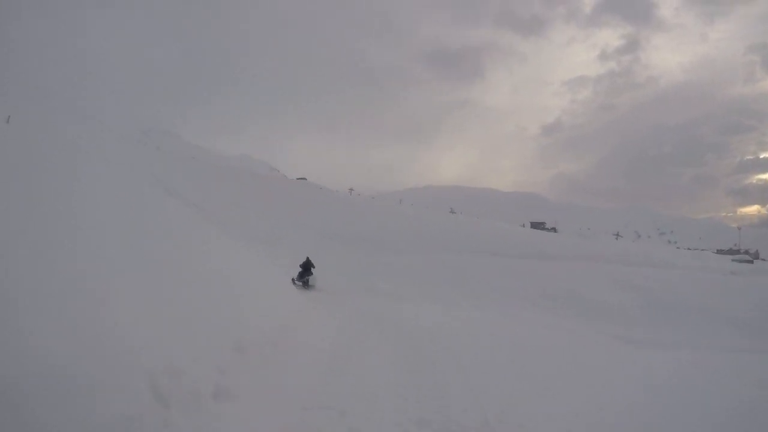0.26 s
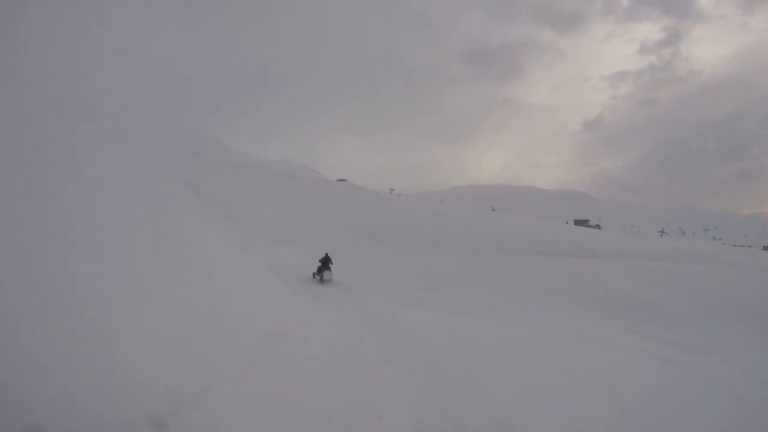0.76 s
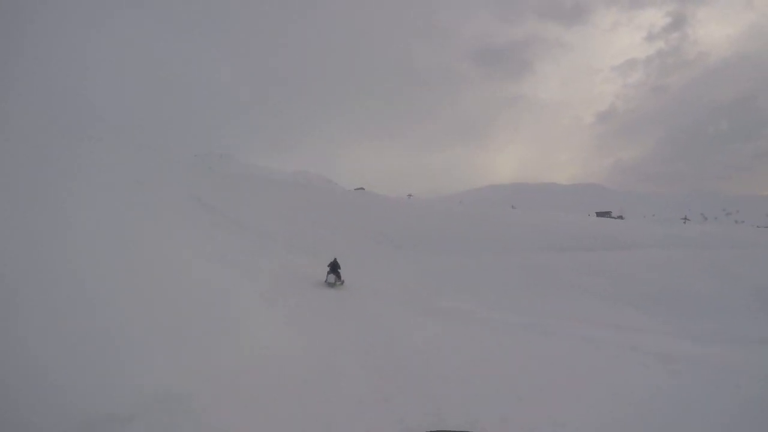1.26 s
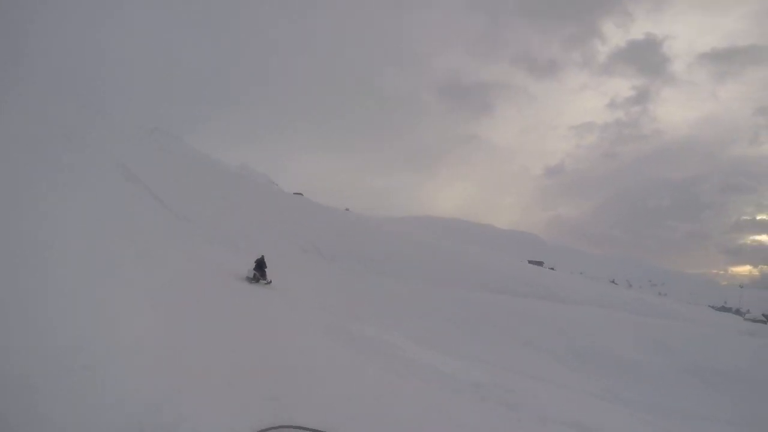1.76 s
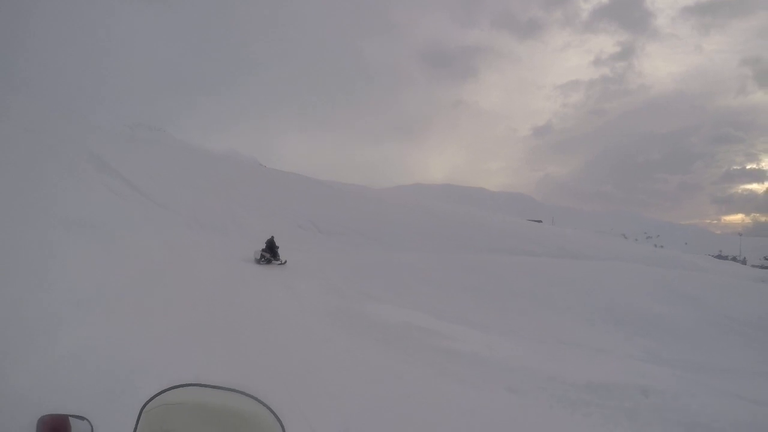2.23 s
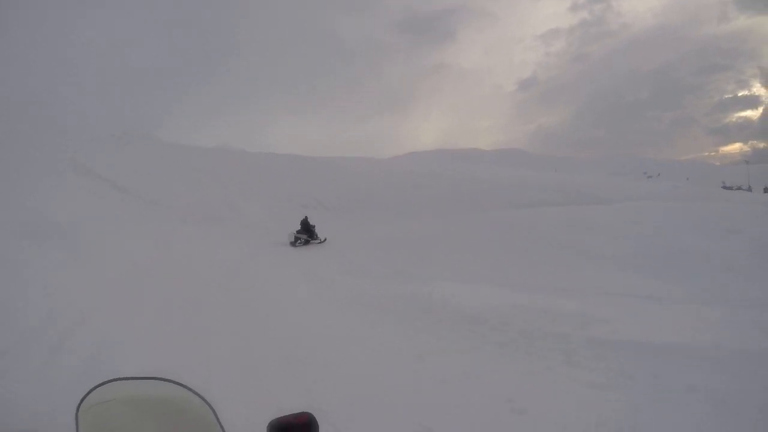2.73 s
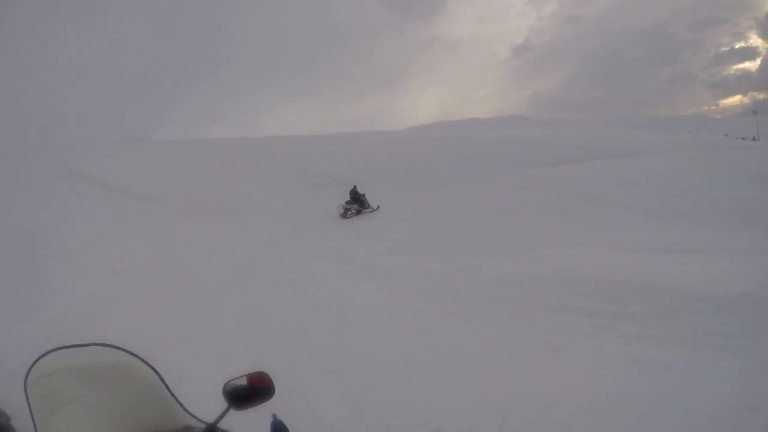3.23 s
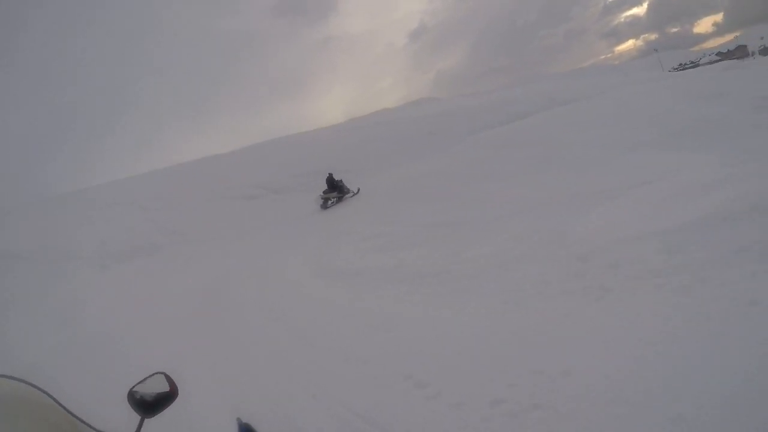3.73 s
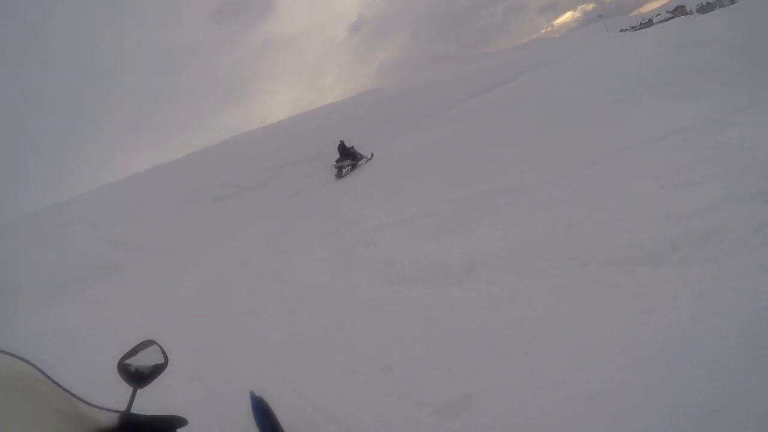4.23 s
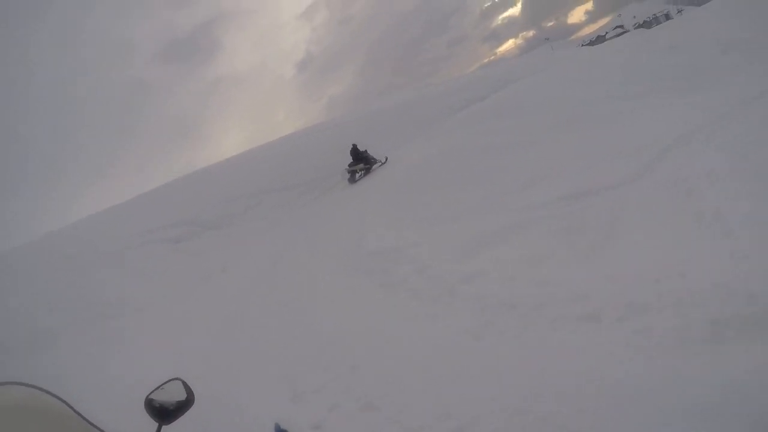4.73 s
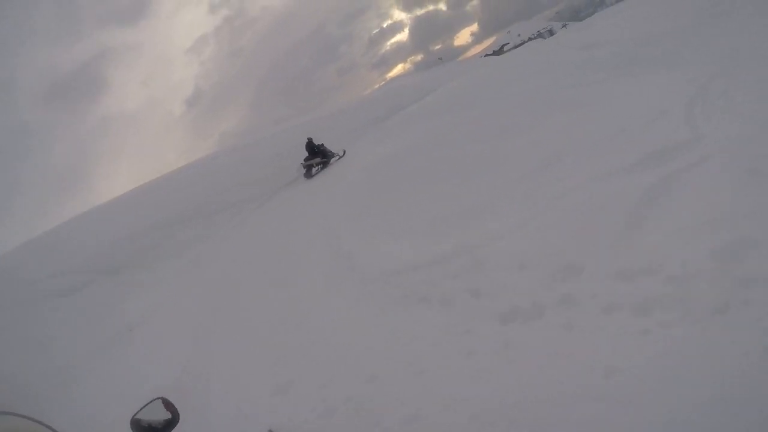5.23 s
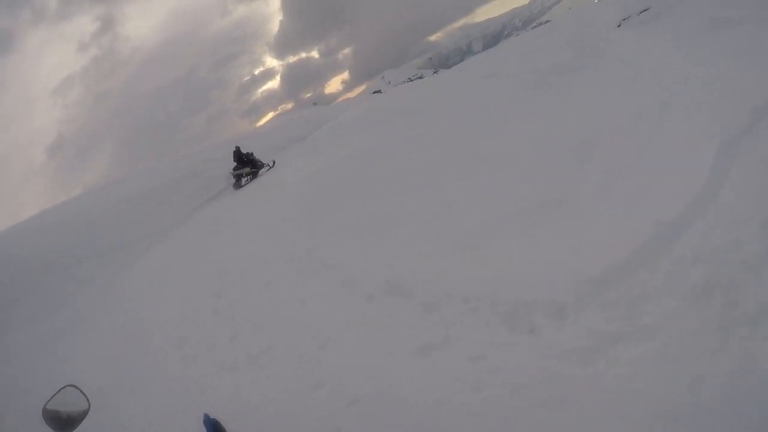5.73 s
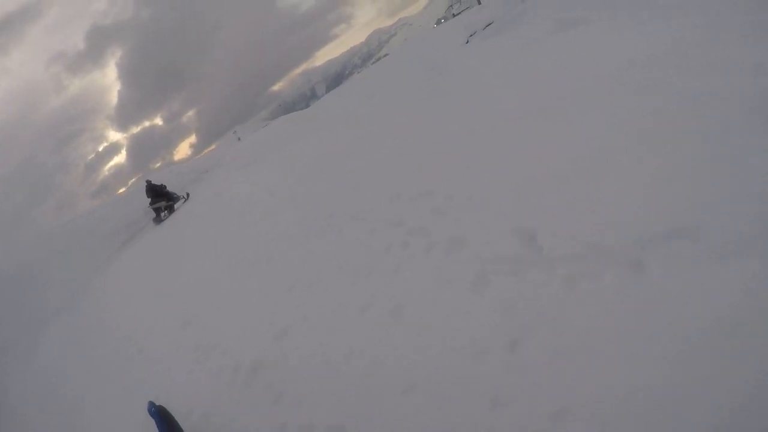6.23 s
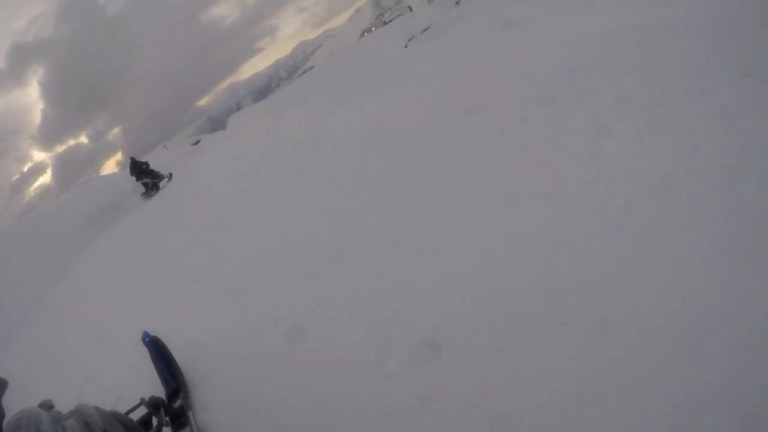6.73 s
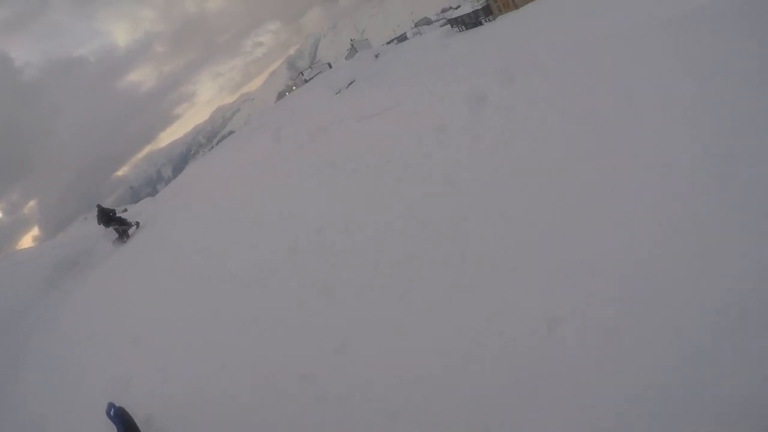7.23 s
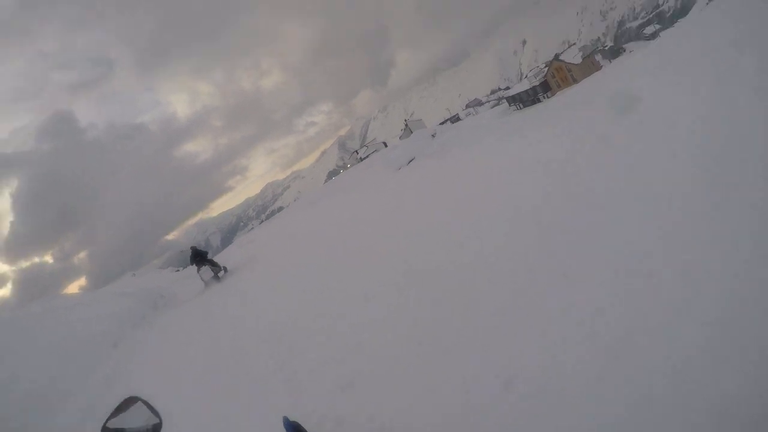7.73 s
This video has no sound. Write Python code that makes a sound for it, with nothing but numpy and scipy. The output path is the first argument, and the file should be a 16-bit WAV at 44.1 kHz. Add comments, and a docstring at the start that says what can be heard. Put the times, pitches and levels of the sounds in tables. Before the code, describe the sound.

Close on a snowmobile in open snow, slightly dull stereo from an onboard microphone. At 0 s a low, buzzing engine drone runs at light throttle with drive clatter, soft track hiss and thin high belt chirps; wind is comparatively light. From about 0.5 s the engine climbs, reaching a higher note near 2 s, with a small thump around 1.7 s as deep buffeting arrives. It sags near 3 s, then holds steady from 3.3 to 5.4 s, a cowl panel buzzing and rattling, hollow wind boom coming and going, with faint ice ticks. At 5.4 s a hard pull sweeps upward to about 6.3 s, intake whining and track hiss swelling under very heavy wind rumble. The revs drop at 6.4-6.6 s, surge again to 7.15 s, then fall away to a low drone. Gusts continue; a dull, heavy jolt knocks at 7.85 s, just before the end at 8 s.

```python
"""A snowmobile heard from the rider's seat on snow, close to every working part.
From the start pipe-coloured orders drone, the cowl hums, drive and track hiss and a faint belt chirps.
It speeds up, then cruises near the cowl's resonance, where the panel rattles once an engine cycle.
Two hard pulls of throttle follow: the intake whines as filtered blows and the track noise swells.
Buffeting, boom and rush of wind come and go at the microphone and gain weight; ice ticks and jolts knock."""
import sys
import numpy as np
from scipy import signal
from scipy.fft import rfft, irfft, next_fast_len
from scipy.io import wavfile
from scipy.ndimage import uniform_filter1d

SR = 44100
rng = np.random.default_rng(int(sys.argv[2]) if len(sys.argv) > 2 else 0)


def log_audio(samples):
    """Write samples as a 16-bit WAV file to the path given in sys.argv[1]."""
    # one column per channel
    frames = np.atleast_2d(samples).T
    # limit to full scale, then quantise
    limited = np.clip(frames, -1, 1)
    pcm = np.round(limited * 32767).astype(np.int16)
    wavfile.write(sys.argv[1], SR, pcm)


N = 351914
T = np.arange(N) / SR
HZ = np.fft.rfftfreq(next_fast_len(N), 1 / SR)

# engine speed: (time [s], rate [engine cycles a second])
SPEED = [(0.0, 32.0), (0.33, 31.78), (0.84, 34.5), (1.13, 35.08), (1.44, 39.16), (1.76, 41.68),
         (2.27, 42.06), (2.38, 41.42), (2.69, 37.86), (3.0, 36.92), (3.3, 38.14), (3.62, 39.32),
         (4.05, 39.62), (4.51, 39.52), (4.73, 38.7), (5.05, 38.82), (5.38, 38.62), (5.6, 42.46),
         (5.82, 46.66), (6.11, 50.86), (6.29, 52.84), (6.6, 42.2), (6.8, 41.68), (7.07, 45.3),
         (7.16, 46.26), (7.27, 43.76), (7.58, 35.4), (7.71, 34.6), (7.98, 30.6)]
# throttle opening: (time [s], opening [0-1])
THROTTLE = [(0.3, 0), (0.8, 0.39), (1.15, 0.52), (1.5, 0.73), (2.05, 0.57), (2.6, 0.44), (2.95, 0.47),
            (3.3, 0.48), (4.5, 0.65), (4.75, 0.38), (5.38, 0.58), (5.48, 0.84), (5.7, 0.85), (6.05, 0.94),
            (6.28, 0.92), (6.33, 0.6), (6.4, 0), (6.52, 0.37), (6.62, 0.55), (6.7, 0.74), (6.85, 0.87),
            (7, 0.88), (7.15, 0.91), (7.21, 0.18), (7.8, 0)]


def gain_of(db):
    """Decibels to an amplitude factor."""
    return np.exp(np.asarray(db) * (np.log(10) / 20))


def evened(x):
    """Scales to rms 1."""
    return x / np.sqrt(np.mean(abs(x) ** 2) + 1e-20)


def read(points, hz):
    """Reads a spectrum table on a log-frequency axis."""
    f, value = np.transpose(points)
    return np.interp(np.log(hz + 1), np.log(f + 1), value)


def curve(rows, axis=1):
    """One column of a time table at every sample."""
    rows = np.asarray(rows)
    return np.interp(T, rows[:, 0], rows[:, axis])


def wander(rate_hz):
    """Random drift of rms 1, with rate_hz new values a second."""
    return evened(np.interp(T * rate_hz, np.arange(4000), rng.standard_normal(4000)))


def wide_open(threshold=.7):
    """How far the throttle is into its top range, 0-1."""
    return np.clip((curve(THROTTLE) - threshold) / (1 - threshold), 0, 1)


def effort(base_db, throttle_db, pace_db, octave_db, cruise_hz=40):
    """Gain of a part: base level, plus so much at full throttle, at full pace and per octave of engine speed."""
    # speed over the snow: (time [s], pace [0-1])
    pace = [(0, 0.18), (1.0, 0.13), (2.0, 0.32), (3.1, 0.22), (3.9, 0.66), (5.3, 0.53), (6.2, 1),
            (6.6, 0.82), (7.8, 0.93), (7.98, 0.44)]
    octaves = np.log2(curve(SPEED) / cruise_hz)
    return gain_of(base_db + throttle_db * curve(THROTTLE) + pace_db * curve(pace) + octave_db * octaves)


def tinted(x, colour):
    """Both channels of x with the given gain at every frequency."""
    size = next_fast_len(N)
    return irfft(rfft(x, size) * colour, size)[:, :N]


def ports(x, other=None, balance=None, phase=None):
    """Sound reaches two microphone ports with a lag and a level difference; diffuse sound is only partly alike."""
    # usual difference between the ports: (frequency [Hz], left minus right [dB])
    port_balance = [(40, 1.3), (110, 1.3), (370, 3.5), (500, 5), (600, 7), (720, 13.5), (820, -1.5),
                    (1080, -4.5), (1300, -1), (2320, -2), (4270, 0.5), (6000, -15.5), (7850, -10),
                    (10000, -6.5), (14000, -10)]
    # usual lag between the ports: (frequency [Hz], left leads [rad])
    port_phase = [(200, -0.44), (560, 0.06), (620, -0.3), (720, -3), (800, -3), (880, -2.5), (1000, -3),
                  (1200, -3), (1400, -4), (1720, -4.5), (2300, -5), (9300, -5)]
    # how alike diffuse sound is at the ports: (frequency [Hz], likeness [0-1])
    port_likeness = [(60, 1), (130, 1), (300, 0.68), (700, 0.78), (1700, 0.74), (3000, 1), (6000, 0.33),
                     (14000, 0.58)]
    balance = port_balance if balance is None else balance
    phase = port_phase if phase is None else phase
    size = next_fast_len(N)
    left = right = rfft(x, size)
    if other is not None:
        same = np.clip(read(port_likeness, HZ), 0, 1)
        right = same * left + np.sqrt(1 - same ** 2) * rfft(other, size)
    ratio = gain_of(read(balance, HZ))
    lagged = right * np.exp(-1j * read(phase, HZ))
    pair = np.array([left * ratio, lagged]) / np.hypot(1, ratio)
    return evened(irfft(pair, size)[:, :N])


def noise(colour):
    """Diffuse noise at the two ports, coloured by a gain at every frequency and scaled to rms 1."""
    return ports(*tinted(rng.standard_normal((2, N)), colour))


def ring(x, spectrum, size=4096):
    """Passes x through a body that rings after each blow, as a minimum-phase filter."""
    log_gain = np.log(gain_of(read(spectrum, abs(np.fft.fftfreq(size, 1 / SR)))))
    response = np.fft.ifft(np.exp(np.conj(signal.hilbert(log_gain)))).real
    return signal.oaconvolve(x, response[:size // 2])[:N]


def blows(turns, rough, puff_turns, uneven_db):
    """Once a cycle a sharp blow of uneven strength and a dying puff of noise."""
    kicks = np.diff(np.floor(turns), prepend=np.floor(turns[0]))
    puffs = np.exp(-(turns % 1) / puff_turns) * rng.standard_normal(N)
    strength = gain_of(uneven_db * rng.standard_normal(1000))[turns.astype(int)]
    return strength * (evened(kicks) + rough * evened(puffs))


def engine_note(turns, speed, waver=0.11):
    """Clean engine orders sweep through the pipe's resonances; their balance shifts with load and throttle."""
    # strength of each order: (multiple of the cycle rate, light load [dB], medium load [dB],
    # heavy load [dB], throttle wide open [dB])
    orders = [(5, -6.5, -14.0, -20.0, -5.5), (6, -1.0, -8.0, -8.5, -3.5), (7, -11.0, -6.5, -9.0, -8.5),
              (8, -2.0, -13.5, -14.0, -11.5), (9, 4.5, 5.0, 1.0, -5.5), (10, -1.0, -2.0, -13.5, -9.0),
              (11, 6.0, -8.5, -5.5, -7.0), (12, -1.5, 5.0, -1.0, -7.5), (13, -7.5, -5.0, -11.5, -8.5),
              (14, 0.5, -9.0, -9.5, -7.0), (15, 0.0, -7.5, -5.0, -14.0), (16, -6.5, -2.0, -2.5, -11.5),
              (17, -12.5, -8.5, -8.0, -12.0), (18, -9.5, 3.0, -3.0, -6.0), (19, -11.5, -5.0, -11.5, -14.5),
              (20, -11.5, -12.5, -6.5, -9.5), (21, -6.0, -6.5, -1.5, -4.5), (22, -8.5, -7.5, -7.5, -10.5),
              (23, -10.5, -1.5, 0.5, -2.5), (24, -4.5, 0.5, -9.0, -12.0), (25, -5.0, -5.0, -4.5, -7.5),
              (26, -7.5, -5.0, -8.0, -11.0), (27, -12.5, 2.5, -3.0, -6.0), (28, -3.0, -1.0, -1.5, -4.5),
              (29, -2.0, -0.0, 1.5, -1.5), (30, -2.5, -6.0, -0.0, -3.0), (31, -4.0, -6.5, -3.5, -6.5),
              (32, -4.5, -6.0, -6.5, -9.5), (33, -5.0, -6.5, -11.5, -14.5)]
    # resonances of the exhaust pipe: (frequency [Hz], gain [dB])
    pipe = [(160, 5), (205, 6), (260, -4), (315, 2), (350, -1.5), (380, 0), (430, -1), (490, -0.5),
            (540, -6), (590, 2), (680, -6.5), (770, -7.5), (840, -2.5), (900, -1.5), (990, 0.5),
            (1120, 0.5), (1250, -8.5), (1450, -16)]
    # load on the engine: (time [s], load [0-1])
    load_rows = [(1.1, 0), (1.35, 0.56), (2.4, 0.61), (2.7, 0.17), (2.95, 0.19), (3.25, 0.44)]
    load = np.clip(curve(load_rows), 0, 1)
    blend = np.sqrt(wide_open())
    tone = np.zeros(N)
    for order, light_db, medium_db, heavy_db, open_db in orders:
        loaded_db = np.interp(load, [0, .5, 1], [light_db, medium_db, heavy_db])
        db = (1 - blend) * loaded_db + blend * open_db
        phase = 2 * np.pi * (round(order) * turns + rng.random()) + waver * wander(14)
        tone += gain_of(db + read(pipe, round(order) * speed)) * np.cos(phase)
    gain = effort(base_db=-46.8, throttle_db=13.5, pace_db=-2.0, octave_db=0.0)
    return ports(tone) * np.std(tone) * gain


def cowl(turns, hum_db=5, shake_hz=39.5, shake_width_hz=0.6, shake_db=8.5):
    """A panel hums with the engine orders; near shake_hz it rattles instead, with one sharp blow a cycle."""
    # resonance of the panel: (frequency [Hz], gain [dB])
    panel = [(1200, -42), (1560, -20), (1620, -6), (1670, 5), (1735, 8.5), (1810, 5.5), (1900, -2.5),
             (2000, -19), (2500, -23.5), (3500, -39)]
    kicks = blows(turns + .93, rough=.05, puff_turns=.2, uneven_db=.3)
    sympathy = 1 / np.sqrt(1 + ((curve(SPEED) - shake_hz) / shake_width_hz) ** 2)
    one_cycle = irfft(np.exp(2j * np.pi * rng.random(80)), 2048)  # orders of random phase
    hum = one_cycle[(turns % 1 * len(one_cycle)).astype(int)]
    rattle = sympathy * gain_of(shake_db) * evened(ring(kicks, panel))
    steady_hum = (1 - sympathy) ** 2 * gain_of(hum_db) * evened(ring(ring(hum, panel), panel))
    buzz = rattle + steady_hum
    gain = effort(base_db=-51.5, throttle_db=12.5, pace_db=7.5, octave_db=9.5)
    return ports(buzz) * np.std(buzz) * gain


def drive(turns, throb_db=0.0, flutter_db=0.89):
    """Clutch, chain and track clatter as noise of fluttering level; a few parts ring in narrow bands."""
    # colour of the clatter: (frequency [Hz], gain [dB])
    clatter_colour = [(150, -11), (300, -10.5), (420, -8), (500, -13.5), (580, -12), (670, -11), (760, -8),
                      (1000, -3.5), (1150, -2), (1300, -5), (1490, -8.5), (1620, 0), (1850, 0),
                      (2050, -8.5), (2300, -13), (2700, -17), (3600, -33.5)]
    # ringing parts: (frequency [Hz], width [Hz], relative level [dB])
    ring_modes = [(830, 17, -7.5), (2115, 47, -12), (2990, 70, -18.5), (3670, 42, -28), (4464, 60, -20),
                  (7000, 73, -40), (7760, 73, -40)]
    clatter = noise(gain_of(read(clatter_colour, HZ)))
    rings = sum(gain_of(db) * evened(1 / (1 + (2 * (HZ - hz) / width) ** 2)) for hz, width, db in ring_modes)
    ringing = noise(rings) * np.sqrt(np.mean(rings ** 2))
    # throb_db would pulse the clatter with the engine; at 0 it is still
    shake = throb_db * np.cos(2 * np.pi * (turns - .85)) + flutter_db * wander(90)
    gain = effort(base_db=-38.5, throttle_db=2.5, pace_db=7.5, octave_db=2.5)
    return (clatter + gain_of(-4.5) * ringing) * gain_of(shake) * gain


def track(turns, throb_db=1.0, suck_db=2.0, grain_db=0.97, roar_db=5.0, steepness=4):
    """Grainy hiss of the track churning snow; it swells and pulses as the open throttle sucks air."""
    # colour of the hiss: (frequency [Hz], gain [dB])
    snow_colour = [(1500, 2.5), (2600, 1.5), (3000, 9.5), (3450, 2.5), (4450, 4.5), (5300, -.5),
                   (6900, 3.5), (7300, 0), (7750, 5), (8300, -2), (9000, 3), (9700, -2), (15000, 1)]
    suction = wide_open() * (curve(SPEED) / np.max(curve(SPEED))) ** steepness
    depth_db = throb_db + suck_db * wide_open()
    grain = depth_db * np.cos(2 * np.pi * (turns - .75)) + grain_db * wander(500)
    hiss = noise(gain_of(read(snow_colour, HZ))) * gain_of(grain + roar_db * suction)
    return hiss * effort(base_db=-47.0, throttle_db=2.5, pace_db=11.5, octave_db=-0.5)


def belt(turns, pitch_hz=9600, width_hz=600, sharpness=2.53, uneven_db=3):
    """The slack belt gives a thin chirp of noise once a cycle, strongest at low engine speed."""
    pulse = np.exp(sharpness * np.cos(2 * np.pi * (turns - .42)))
    gate = evened(pulse * gain_of(uneven_db * wander(60)))
    chirp = noise(np.exp(-((HZ - pitch_hz) / width_hz) ** 2))
    return chirp * gate * effort(base_db=-63.0, throttle_db=3.0, pace_db=4.5, octave_db=-27)


def gusts(spectrum, gain):
    """Turbulence of the given colour, levelled over 5000 samples so that its strength follows gain."""
    air = noise(gain_of(read(spectrum, HZ)) / (1 + (HZ / 900) ** 4))
    return air / np.sqrt(uniform_filter1d((air ** 2).mean(0), size=5000)) * gain


def wind(buffet_lumps_db=1.5, boom_lumps_db=2.0, lumps_hz=16):
    """Lumpy, gusting deep buffeting and a hollow boom from the microphone housing; a softer rush above them."""
    # wind on the microphone before lumps and gusts: (time [s], buffeting [dB], hollow boom [dB])
    wind_rows = [(0.0, -45, -46), (1.37, -56, -77), (1.91, -27.5, -30), (2.46, -27.5, -38.5),
                 (2.69, -28, -28), (4.06, -25, -27), (4.89, -25.5, -29.5), (5.61, -24, -30.5),
                 (5.89, -9, -29.5), (7.13, -18, -15.5), (7.27, -23.5, -23), (7.79, -14, -21),
                 (7.98, -17, -41)]
    # strongest gusts and lulls: (time [s], length [s], lift of the buffeting [dB], lift of the boom [dB])
    gust_rows = [(1.7, 0.058, 11, 12), (2.66, 0.13, 4.5, 7), (2.954, 0.2, -3, 3.5), (3.397, 0.052, 3, 5.5),
                 (3.892, 0.17, -2, 7), (4.12, 0.2, 4.5, 2.5), (4.375, 0.0376, -9, 7), (4.663, 0.1, -4, 15),
                 (5.287, 0.12, 4, 5.5), (5.87, 0.13, -13, 9.5), (6.024, 0.088, -10.5, 14),
                 (6.15, 0.061, -4, -9), (6.345, 0.13, -7, 11), (6.53, 0.23, -8, 7.5), (6.98, 0.19, 6.5, -1),
                 (7.356, 0.046, 2, 14.5), (7.663, 0.069, -4, 10.5)]
    # colours of buffeting, boom and rush, each: (frequency [Hz], gain [dB])
    buffet_colour = [(12, -10), (24, -11), (33, -2), (45, 2), (60, -6.5), (80, -11.5), (130, -25),
                     (250, -37.5), (600, -75)]
    hollow_colour = [(50, -56), (80, -25.5), (102, 0), (116, -1), (130, -14.5), (150, -29.5), (220, -36.5),
                     (450, -48)]
    rush_colour = [(60, -53), (120, -12), (165, 4), (220, -6.5), (300, -7.5), (500, -14.5), (1000, -31)]
    buffet_db = curve(wind_rows, axis=1) + buffet_lumps_db * wander(lumps_hz)
    boom_db = curve(wind_rows, axis=2) + boom_lumps_db * wander(lumps_hz)
    for s, length, buffet_lift_db, boom_lift_db in gust_rows:
        swell = np.exp(-(2 * (T - s) / length) ** 2)
        buffet_db = buffet_db + buffet_lift_db * swell
        boom_db = boom_db + boom_lift_db * swell
    rush = gusts(rush_colour, effort(base_db=-35.5, throttle_db=-3.5, pace_db=-1.0, octave_db=9.0))
    return gusts(buffet_colour, gain_of(buffet_db)) + gusts(hollow_colour, gain_of(boom_db)) + rush


def knocks(tick_s=0.0029, tick_db=-10):
    """Tiny noise ticks of ice grains on the sled and dull jolts of the mount over bumps, as dying sines."""
    # ice grains: (time [s], level before tick_db [dB])
    tick_rows = [(0.5112, -30), (1.7516, -30), (2.8734, -33), (3.3284, -34), (4.1942, -30)]
    # jolts: (time [s], level before the left and right offsets [dB], pitch [Hz], decay [s])
    jolt_rows = [(1.683, -13, 232, 0.0028), (1.690, -33, 75, 0.011), (7.839, -13, 242, 0.015),
                 (7.853, 0.5, 160, 0.004), (7.854, -11.5, 517, 0.005), (7.854, -15, 717, 0.003)]
    out = np.zeros((2, N))
    for s, db, hz, decay in jolt_rows:
        age = np.maximum(T - s, 0)
        sides = gain_of([[db + 2.5], [db - 4.5]])  # left, right
        out += sides * np.sin(2 * np.pi * hz * age) * np.exp(-np.minimum(age / decay, 50))
    ticks = np.zeros(N)
    for s, db in tick_rows:
        ticks += gain_of(db + tick_db) * (T >= s) * np.exp(-np.minimum(abs(T - s) / tick_s, 50))
    return out + ticks * noise(np.exp(-((HZ - 9000) / 3500) ** 2))


def intake(turns, level_db=-23):
    """Near full throttle the engine gulps air once a cycle; its orders glide through the duct's resonance."""
    # broad resonance of the intake duct: (frequency [Hz], gain [dB])
    duct = [(450, -28), (520, -22), (575, -2), (630, -22), (700, -20), (760, -9), (820, -11), (900, -1),
            (965, 2.5), (1030, -1), (1180, -1), (1250, -7), (1320, -16), (1420, -12), (1550, -14),
            (1750, -32)]
    # the duct at the two ports: (frequency [Hz], left minus right [dB])
    duct_balance = [(570, 11), (720, 9), (820, 0), (930, 2), (970, 10), (1030, 1), (1200, 1), (1270, 8),
                    (1400, 0)]
    # and its lag between them: (frequency [Hz], left leads [rad])
    duct_phase = [(570, -.4), (720, -3), (880, -2.7), (940, -2.1), (980, -1.7), (1030, -3), (1200, -3.3),
                  (1400, -4)]
    kicks = blows(turns + .6, rough=.07, puff_turns=.3, uneven_db=.5)
    whine = ports(ring(kicks, duct), balance=duct_balance, phase=duct_phase)
    return whine * wide_open() ** 0.79 * gain_of(level_db)


def scene():
    """All engine parts follow one slightly unsteady crankshaft, with the wind beside them."""
    speed = curve(SPEED) * (1 + .0012 * wander(30))
    turns = np.cumsum(speed) / SR  # engine cycles since the start
    engine = engine_note(turns, speed) + intake(turns) + cowl(turns)
    return engine + drive(turns) + track(turns) + belt(turns) + wind()


def record(dry, floor_db=-60, edge_hz=15030):
    """The microphone housing dulls the scene but not the knocks; then hiss, soft overload and a band limit."""
    # microphone treble: (frequency [Hz], gain [dB])
    mic_treble = [(9600, -0.5), (10100, -5), (10700, -12.5), (11300, -36), (14500, -34)]
    heard = tinted(dry, gain_of(read(mic_treble, HZ))) + knocks()
    heard = heard + gain_of(floor_db) * rng.standard_normal((2, N))  # steady hiss of the microphone
    held = heard / (1 + (heard / .85) ** 8) ** (1 / 8)
    band_limit = signal.firwin(511, edge_hz, window=("kaiser", 9), fs=SR)
    return signal.oaconvolve(held, band_limit[None], "same")


dry = scene()
out = record(dry)
log_audio(out)
```